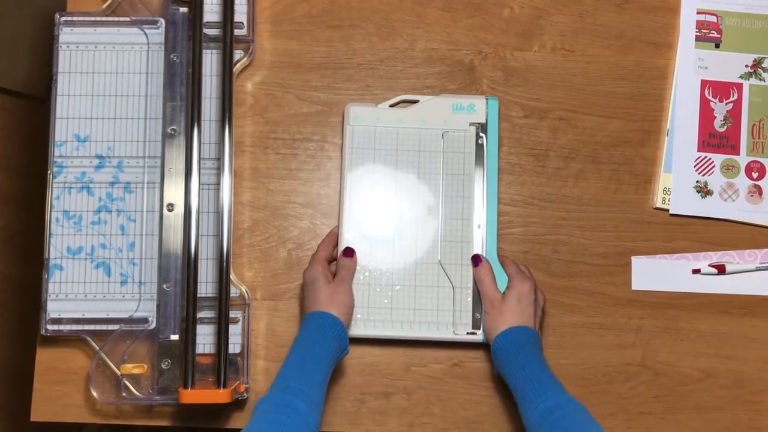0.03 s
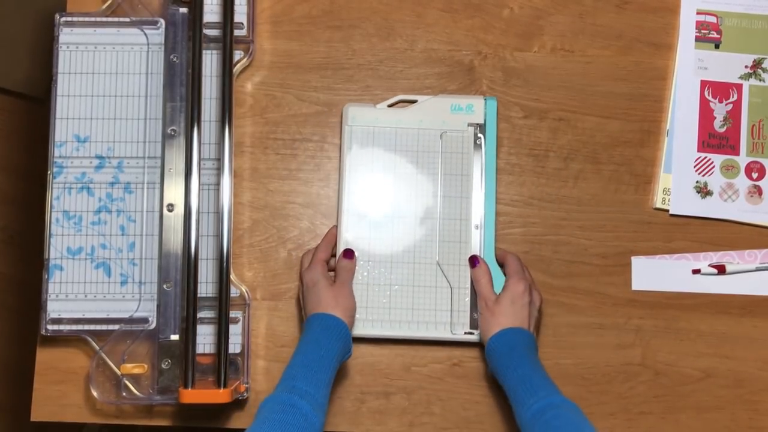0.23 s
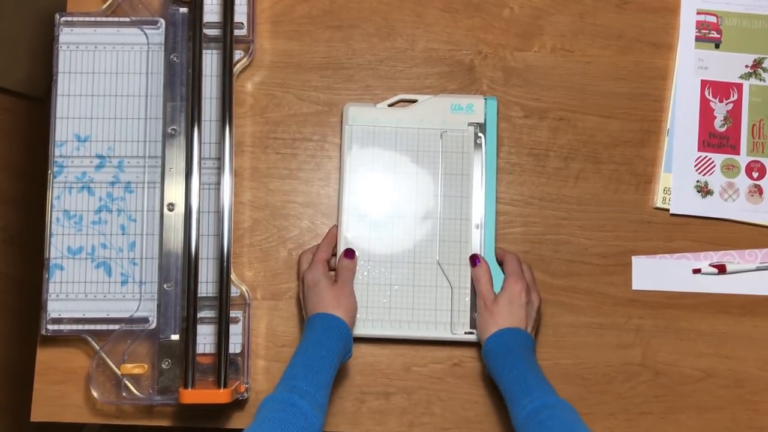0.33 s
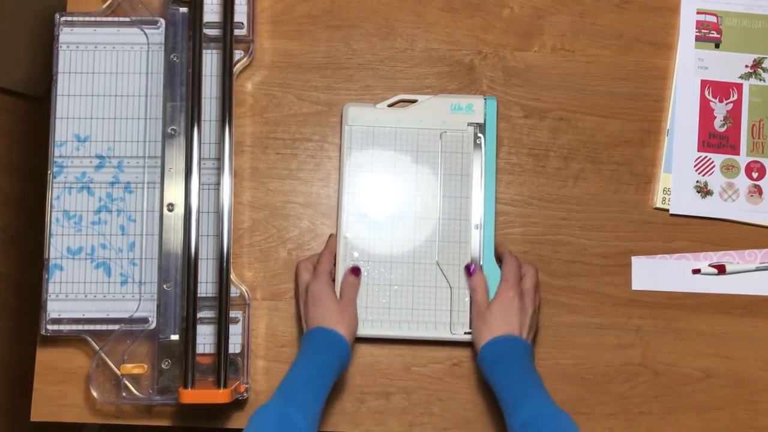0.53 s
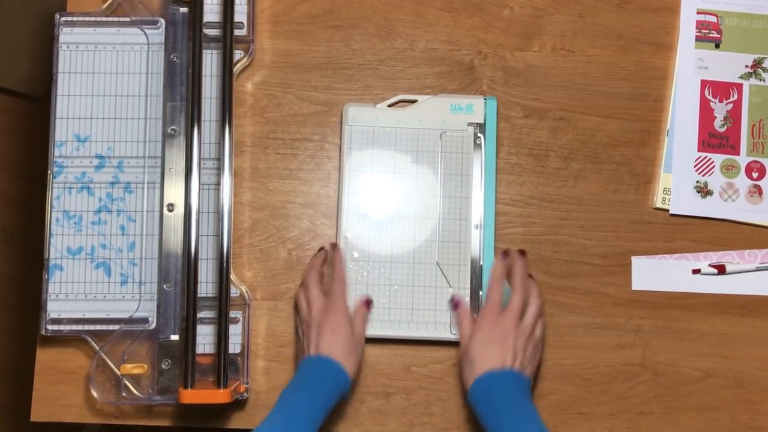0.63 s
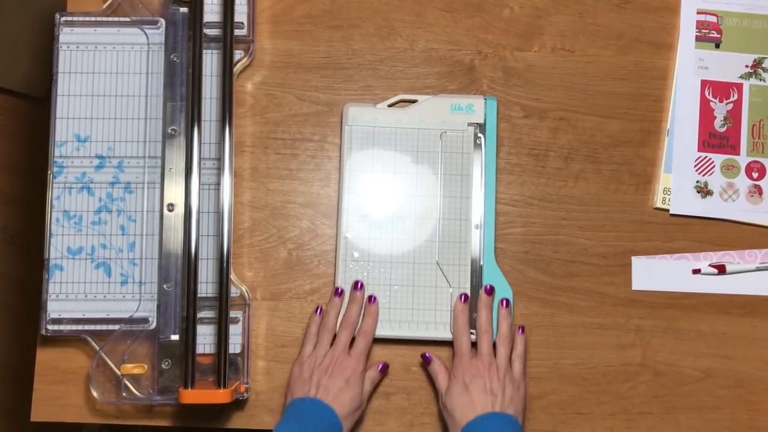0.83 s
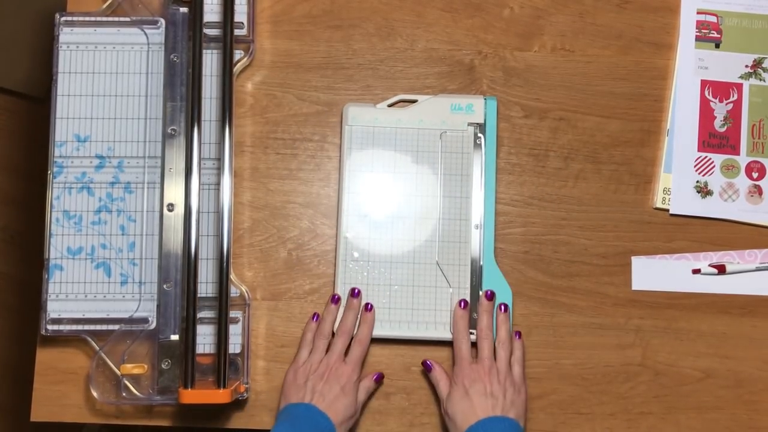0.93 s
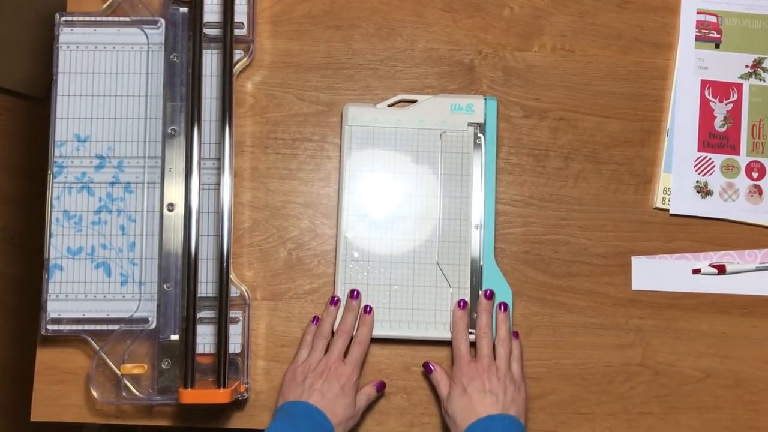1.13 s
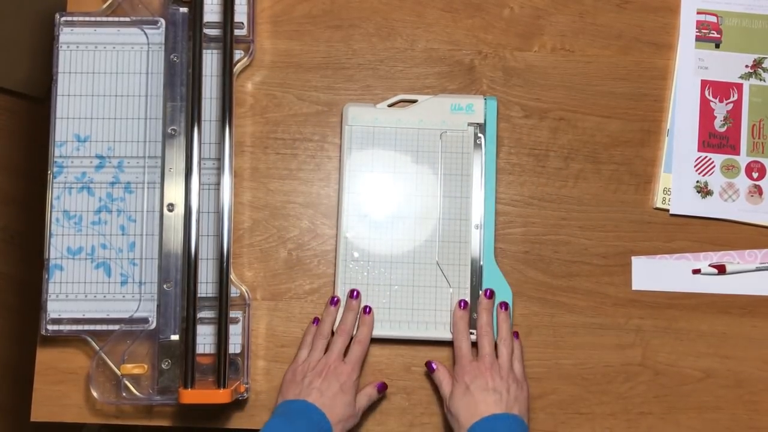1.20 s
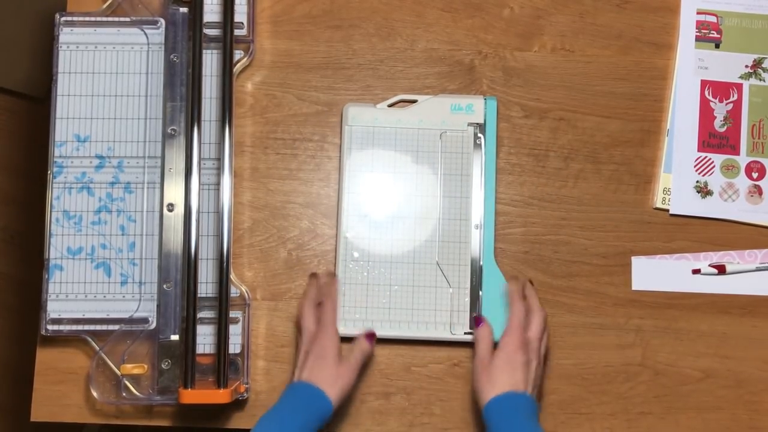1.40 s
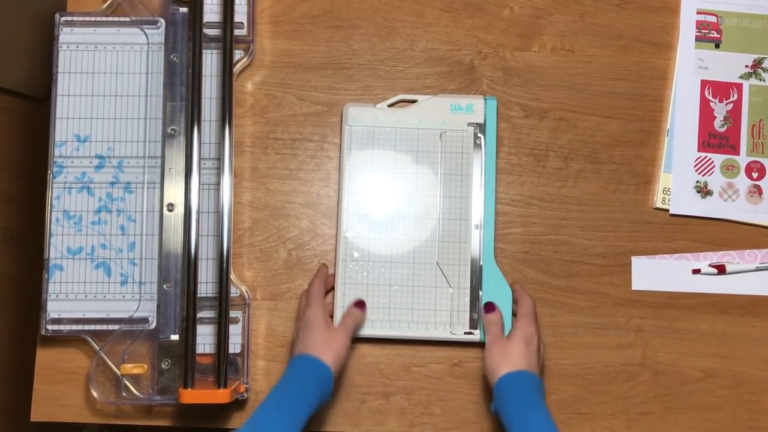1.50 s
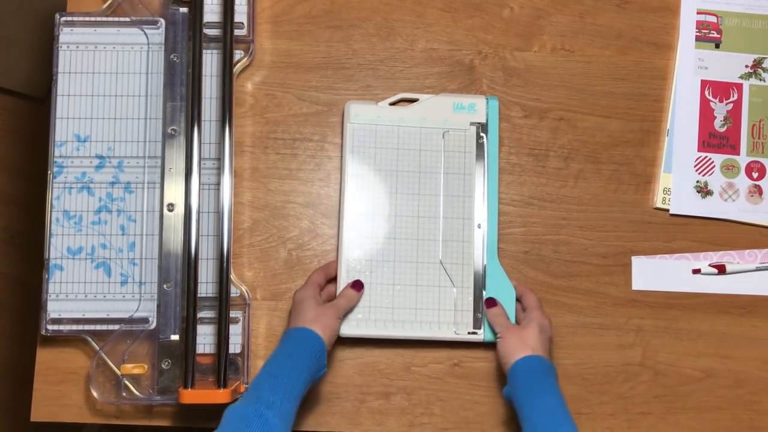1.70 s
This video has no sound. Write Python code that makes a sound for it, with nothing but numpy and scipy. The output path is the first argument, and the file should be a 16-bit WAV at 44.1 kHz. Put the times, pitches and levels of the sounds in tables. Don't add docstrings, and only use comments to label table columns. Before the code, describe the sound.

Close up in a quiet small room, fingers rub plastic, one board edge clacks on a wooden table, the other slaps down louder, then a lighter press knock and a few nail clicks follow.

```python
import sys
import numpy as np
from scipy import signal
from scipy.io import wavfile
from scipy.ndimage import uniform_filter1d

SR = 44100
rng = np.random.default_rng(int(sys.argv[2]) if len(sys.argv) > 2 else 0)


def level_to_linear(level):
    exponent = np.asarray(level, float) / 20
    return 10 ** exponent


def bounce(signal):
    frames = np.transpose(np.atleast_2d(signal))
    limited = np.clip(frames, -1, 1)
    pcm = np.round(limited * 32767).astype(np.int16)
    wavfile.write(sys.argv[1], SR, pcm)


N = 77175


def evened(x):
    return x / np.sqrt(np.mean(x ** 2) + 1e-20)


def read(points, hz):
    f, value = np.transpose(points)
    return np.interp(np.log(hz + 1), np.log(f + 1), value)


def add(mix, start_s, sound):
    part = mix[round(start_s * SR):][:len(sound)]
    part += sound[:len(part)]


def band(x, hz, wide_hz):
    turn = np.exp(2j * np.pi * hz * np.arange(len(x)) / SR)
    r = np.exp(-np.pi * wide_hz / SR)
    return (turn * signal.lfilter([1], np.convolve([1, -r], [1, -r]), x / turn)).real


def ring(modes, spread, tilt_db=0):
    t, out = np.arange(SR // 2) / SR, 0
    for k, (hz, db, t60_s) in enumerate(modes):
        near_hz = hz * (1 + spread * np.array([[-.6], [1]]))
        waves = np.sin(2 * np.pi * hz * t) + 0.34 * np.sin(2 * np.pi * near_hz * t).sum(0)
        level_db = db + tilt_db * np.log2(hz / 2000) - 60 * t / t60_s
        out = out + (-1) ** k * level_to_linear(level_db) * waves
    return out / abs(out).max()


def landings(hits, modes):
    out, body = np.zeros(N), ring(modes, spread=.045)
    for start_s, db, contact_s in hits:
        phase = np.clip((np.arange(200) + .5) / SR / max(contact_s, 1e-4), 0, 1)
        push = np.sin(np.pi * phase)
        add(out, start_s, level_to_linear(db) * 2 * np.convolve(body, push / push.sum()))
    return out


# frequency in Hz, level in dB.
HUSH = [(15, -37), (30, -32.5), (45, 3), (100, -9.5), (250, -5), (451, -13.5), (9000, -30), (12600, -32.5)]
HUSH_DB, PATCHY_DB = -66, -0.18
RUMBLE_HZ, RUMBLE_WIDE_HZ, RUMBLE_DB = 48, 24.8, -70


def hush():
    frames, hz = N // 256 + 5, np.fft.rfftfreq(1024, 1 / SR)
    a, b, patches = rng.standard_normal((frames, 513, 3)).T
    patches = uniform_filter1d(patches, 12, 0)
    patches = evened(uniform_filter1d(patches, 10, 1))
    z = (a + 1j * b) * level_to_linear(read(HUSH, hz)[:, None] + PATCHY_DB * patches)
    air = signal.istft(z, nperseg=1024, noverlap=768)[1][:N]
    rumble = band(rng.standard_normal(N), RUMBLE_HZ, RUMBLE_WIDE_HZ)
    return level_to_linear(HUSH_DB) * evened(air) + level_to_linear(RUMBLE_DB) * evened(rumble)


# time in seconds, level in dB.
RUB = [(0, -63), (.09, -64.5), (.14, -64.5), (.2, -61), (.4, -59.5), (.5, -69.5), (1.6, -123),
       (1.665, -67.5), (1.75, -83)]
# frequency in Hz, width in Hz, level in dB.
SKIN = [(373, 460, -5), (1100, 500, -5), (3000, 1550, -3), (6370, 2300, -15)]


def rubbing():
    grain_db = 2.13 * evened(uniform_filter1d(rng.standard_normal(N), 150))
    grain = rng.standard_normal(N) * level_to_linear(grain_db)
    tone = evened(sum(level_to_linear(db) * evened(band(grain, hz, wide_hz)) for hz, wide_hz, db in SKIN))
    return tone * level_to_linear(np.interp(np.arange(N) / SR, *np.transpose(RUB)))


# start in seconds, peak in dB, pitch in Hz, t60 in seconds.
TICKS = [(.1586, -53, 2050, 0.026), (.171, -55, 1990, 0.022), (.356, -55, 6160, 0.016),
         (1.313, -58, 4450, 0.01), (1.4522, -43, 2350, 0.0078), (1.4524, -48.5, 3000, 0.0096),
         (1.4956, -46.5, 2860, 0.012), (1.4958, -64.5, 4060, .015), (1.6692, -50, 2070, .025),
         (1.6695, -57, 3340, 0.035), (1.059, -64, 2100, 0.017), (1.065, -59, 2010, 0.031),
         (1.6928, -41.5, 2100, 0.011), (1.693, -53, 3200, 0.0091), (1.7115, -58.5, 3300, 0.017),
         (1.7445, -55, 2750, 0.024), (1.7446, -62, 5730, .015)]
TICK_RISE_S = 0.00062


def ticks():
    out, t = np.zeros(N), np.arange(2000) / SR
    for start_s, db, hz, t60_s in TICKS:
        fade = level_to_linear(db - 60 * t / t60_s) * np.minimum(t / TICK_RISE_S, 1)
        add(out, start_s, fade * np.sin(2 * np.pi * hz * t))
    return out


# frequency in Hz, level in dB, t60 in seconds.
EDGE = [(64.2, -15.5, 0.34), (120, -12, 0.26), (175, -4.5, 0.069), (238, 1, .11), (332, -5, 0.044),
        (440, -14, 0.074), (713, -12, 0.042), (992, -9, 0.12), (1290, -14, 0.032)]
# start in seconds, level in dB, contact in seconds.
EDGE_HITS = [
    (.2158, -29.5, 0.00092),
    (.2430, -40, 0.00056),
]


def edge_landing():
    return landings(EDGE_HITS, EDGE)


# frequency in Hz, level in dB.
RAIL = [(1350, -16), (1720, -8.5), (1985, -6), (2200, -1.5), (2450, -3), (2800, -10), (3250, -6),
        (4100, -5), (4715, -3.5), (5400, -7), (6120, -3), (7000, -9), (8000, -9.5), (9200, -8.5)]
# start in seconds, length in seconds, level in dB,
# treble tilt in dB per octave, fizz in dB.
RATTLES = [
    (.2258, 0.019, -37.5, -0.5, -58),
    (0.2294, 0.0029, -34, 1.5, -52),
    (0.4276, .005, -38, -4, -95),
    (1.1269, .01, -50.5, -10.5, -110),
    (1.668, 0.011, -63.5, -1, -110),
    (1.048, .022, -74.5, -5.5, -110),
    (1.642, 0.0058, -73, -2, -110),
]
RAIL_T60_S, RAIL_SPREAD = .016, .07
CLACKS_PER_S, CLACK_SPREAD_DB = 2500, 3
FIZZ_HZ, FIZZ_WIDE_HZ = 12030, 1100


def rail():
    loose, top, slot = np.zeros(N), np.zeros(N), np.arange(2000)
    modes = [(hz, db, RAIL_T60_S * np.sqrt(2200 / hz)) for hz, db in RAIL]
    for start_s, length_s, db, tilt_db, fizz_db in RATTLES:
        chance, luck, sign = rng.random((3, len(slot)))
        size = level_to_linear(CLACK_SPREAD_DB * np.minimum(-np.log(luck + 1e-9), 3))
        struck = ((chance < CLACKS_PER_S / SR) | (slot == 0)) & (slot < length_s * SR)
        clacks = struck * size * np.sign(sign - .5)
        tone = np.convolve(clacks, ring(modes, RAIL_SPREAD, tilt_db)[:3000])
        fizz = band(np.r_[clacks, 0 * clacks], FIZZ_HZ, FIZZ_WIDE_HZ)
        held = slice(0, int(length_s * SR) + 100)
        add(loose, start_s, level_to_linear(db) * tone / tone[held].std())
        add(top, start_s, level_to_linear(fizz_db) * fizz / fizz[held].std())
    return loose, top


# frequency in Hz, level in dB, t60 in seconds.
FLAT = [(62.7, -20, 0.39), (127, -15.5, 0.11), (168.5, -5.5, 0.22), (213, -1, 0.22), (252.2, -4, 0.18),
        (350.3, -16, 0.17), (426, -2, 0.072), (491, 6, 0.028), (622.8, -1.5, 0.12), (624.5, -7.5, 0.11),
        (747, 2.5, 0.078), (857, -8, 0.093), (985, -0.5, 0.028), (1522, -9, 0.052)]
# start in seconds, level in dB, contact in seconds.
FLAT_HITS = [
    (.4250, -26.5, 0.0007),
    (.4540, -52.5, 0.0012),
    (.6010, -54.5, 0.00045),
    (.6075, -48, 0.0021),
    (.6370, -62, 0.0036),
    (.69, -60, 0.0011),
]


def flat_slap():
    return landings(FLAT_HITS, FLAT)


# frequency in Hz, level in dB, t60 in seconds.
PRESS = [(145, -11, 0.3), (225, 1, 0.187), (282, -6, 0.085), (456, -2.5, 0.043), (590, -4, 0.028),
         (727, -2, 0.044), (815, -5, 0.05), (1022, -0.5, 0.032), (1270, -17.5, 0.065), (1335, -5, 0.03),
         (1616, -8, 0.063), (2100, -12.5, 0.058), (2410, -13.5, 0.033), (3000, -13.5, 0.042)]
# start in seconds, level in dB, contact in seconds.
PRESS_HITS = [
    (1.0530, -58, 0.00038),
    (1.0640, -54, 0.00043),
    (1.1305, -41.5, 0.00013),
    (1.1330, -31.5, 0.00017),
    (1.6550, -56, 0.00037),
    (1.6610, -57, 0.00042),
    (1.6700, -67, 0.00033),
    (1.1780, -56.5, .0006),
]


def hand_press():
    return landings(PRESS_HITS, PRESS)


# frequency in Hz, t60 in seconds.
ROOM = [(100, 0.57), (250, 0.26), (1000, 0.29), (3000, 0.22), (6000, 0.2), (10000, 0.23)]
# frequency in Hz, level in dB.
ROOM_COLOUR = [(100, -9), (300, -7), (700, -8), (8000, -3), (11000, -13.5)]
GAP_S = .004


def room(x):
    taps = np.zeros(SR)
    at = np.arange(0, SR - 20, 20) + rng.integers(0, 20, SR // 20 - 1)
    taps[at] = rng.choice([-1., 1.], len(at))
    hz, t, z = signal.stft(taps, SR, nperseg=512)
    level_db = read(ROOM_COLOUR, hz)[:, None] - 60 * t / read(ROOM, hz)[:, None]
    tail = signal.istft(z * level_to_linear(level_db), SR, nperseg=512)[1]
    faded = tail[:30000] * np.hanning(60000)[30000:]
    tail = np.r_[np.zeros(int(GAP_S * SR)), faded]
    return signal.fftconvolve(x, tail / np.linalg.norm(tail))[:N]


BOARD_ROOM_DB, RAIL_ROOM_DB, TICK_ROOM_DB = -5, -7, -18


def scene():
    air, rub, nails = hush(), rubbing(), ticks()
    loose, fizz = rail()
    board = edge_landing() + flat_slap() + hand_press()
    sent = level_to_linear(BOARD_ROOM_DB) * board + level_to_linear(RAIL_ROOM_DB) * loose + level_to_linear(TICK_ROOM_DB) * nails
    mono = board + loose + fizz + nails + room(sent) + rub + air
    return np.array([mono, mono])


THIN_HZ, THIN_DB_PER_KHZ, THIN_LUCK_DB, THIN_MASK = 9100, 6, 3.5, .24
GROUP_HZ = 700


def thinned(x):
    hz, t, z = signal.stft(x, SR, nperseg=2048, noverlap=1536)
    group = (hz // GROUP_HZ).astype(int)
    power = np.array([(abs(z[group == g]) ** 2).mean(0) for g in range(group.max() + 1)])
    level_db = 10 * np.log10(power + 1e-20)
    over_db = level_db - np.median(level_db, 1)[:, None]
    luck = rng.standard_normal((len(t) // 2 + 1, len(power)))
    luck = np.repeat(luck, 2, 0)[:len(t)].T
    centre_hz = np.arange(len(power))[:, None] * GROUP_HZ + GROUP_HZ / 2
    above_khz = np.clip(centre_hz - THIN_HZ, None, 1100) / 1000
    masked_db = THIN_MASK * over_db[1] * 2 * (above_khz > -3)
    keep = over_db + THIN_LUCK_DB * luck > THIN_DB_PER_KHZ * above_khz + masked_db
    return signal.istft(z * keep[group], SR, nperseg=2048, noverlap=1536)[1][:N]


def low_pass(x):
    return signal.sosfilt(signal.butter(12, 13740, fs=SR, output="sos"), x)


MIC_LOW_HZ, SIDE_DB = 35.6, -20


def record(dry):
    low_cut = signal.butter(3, MIC_LOW_HZ, 'high', fs=SR, output='sos')
    mid = thinned(signal.sosfilt(low_cut, dry[0]))
    side = level_to_linear(SIDE_DB) * band(mid, 5350, 3600) * 0.061
    return low_pass(mid + np.array([side, -side]))


dry = scene()
out = record(dry)
bounce(out)
```